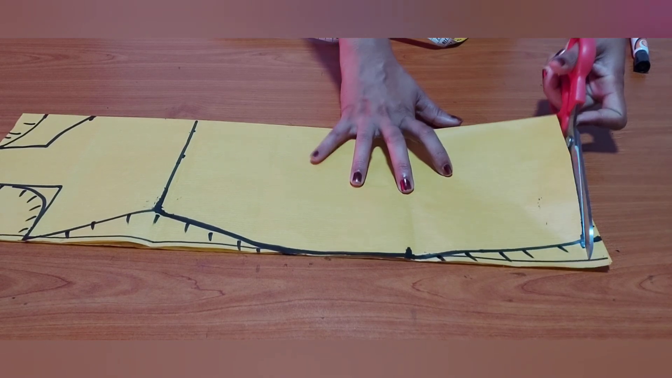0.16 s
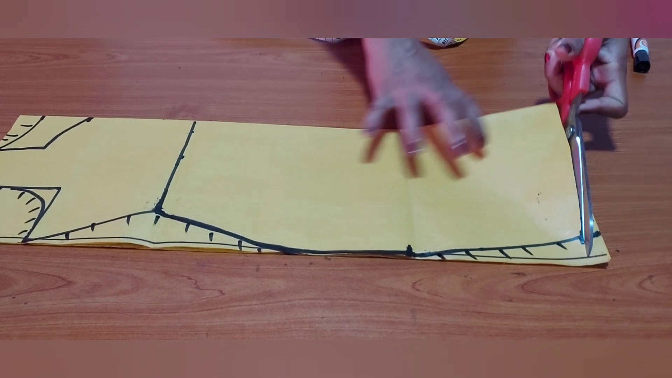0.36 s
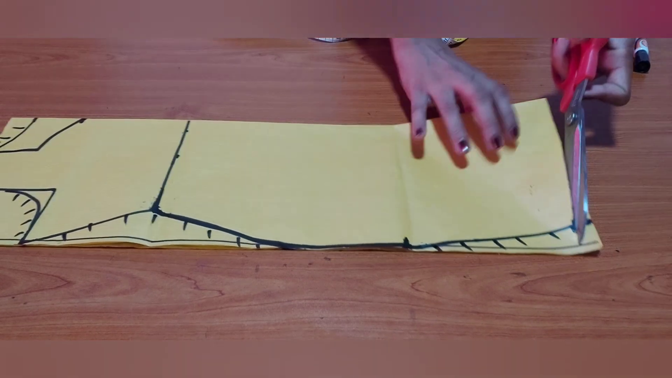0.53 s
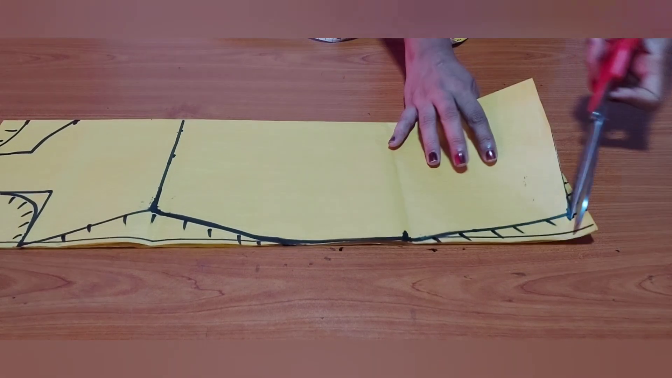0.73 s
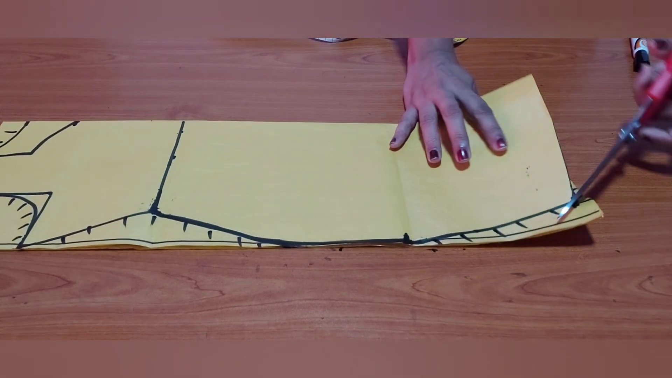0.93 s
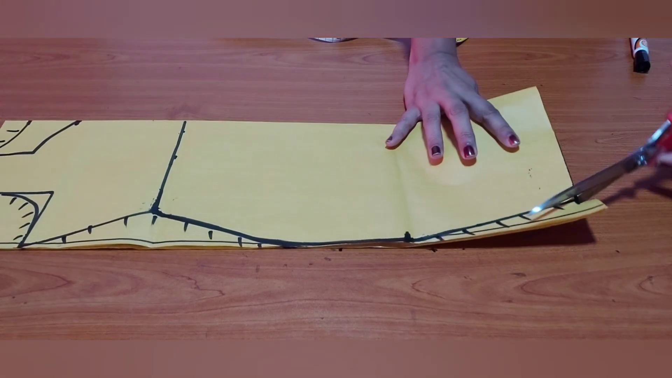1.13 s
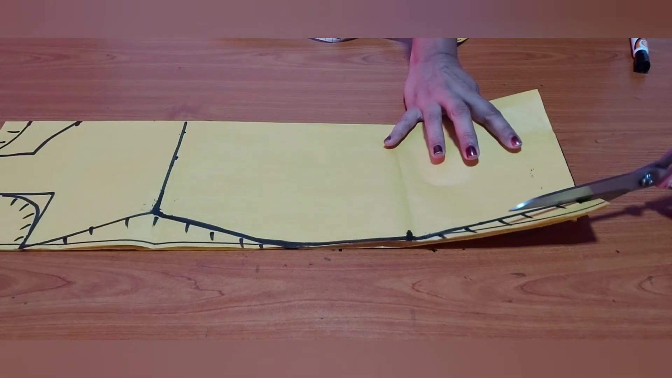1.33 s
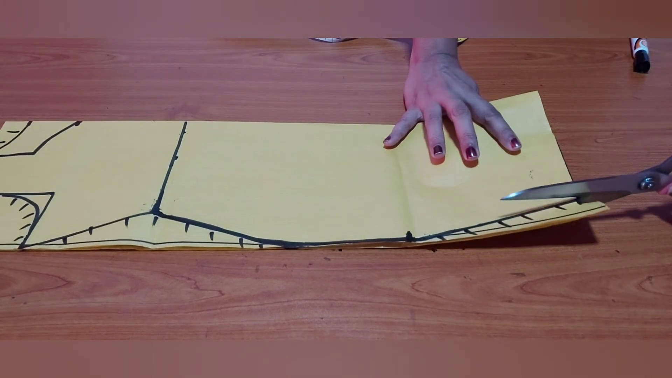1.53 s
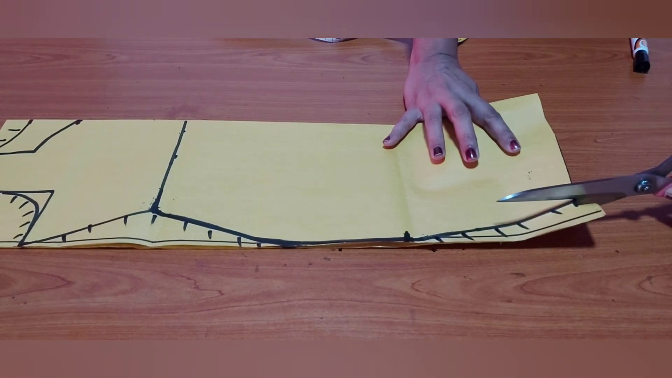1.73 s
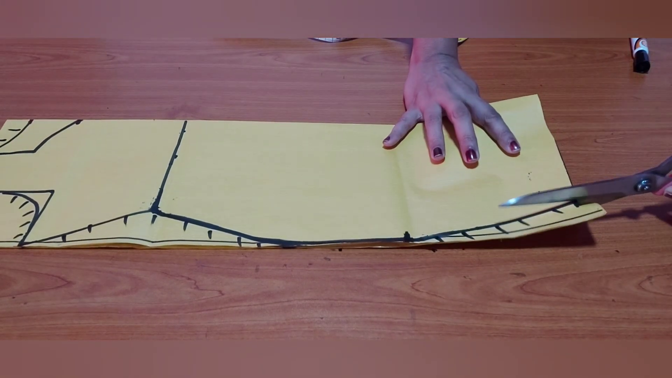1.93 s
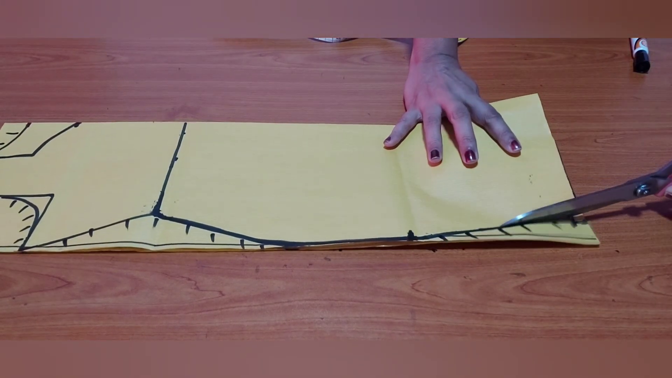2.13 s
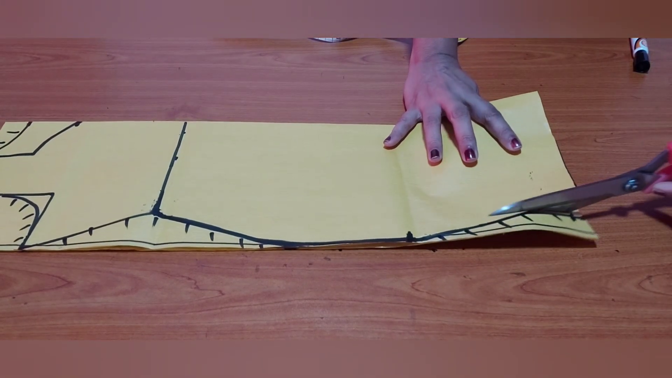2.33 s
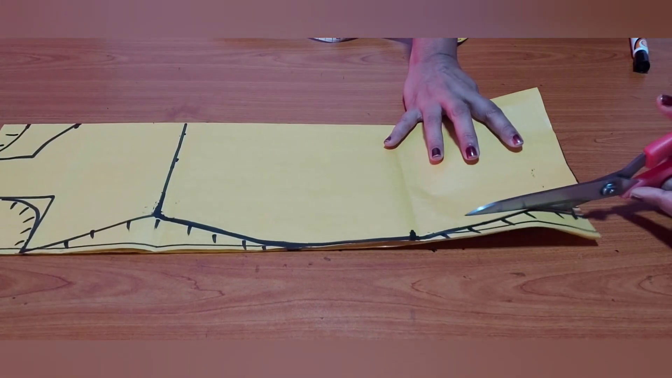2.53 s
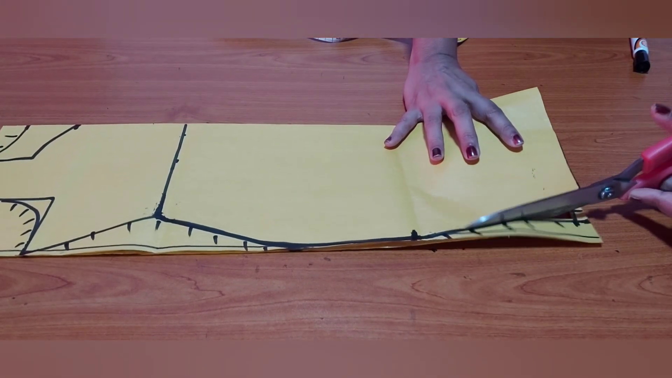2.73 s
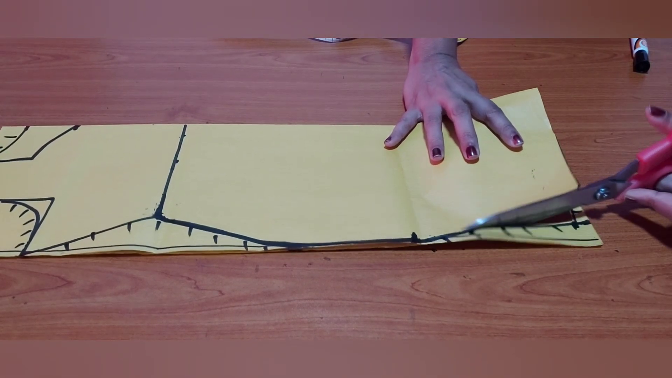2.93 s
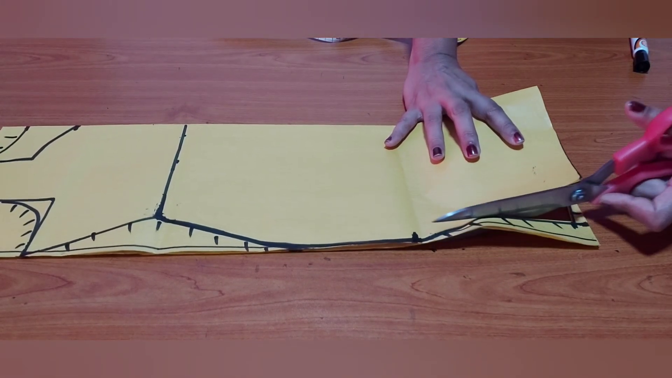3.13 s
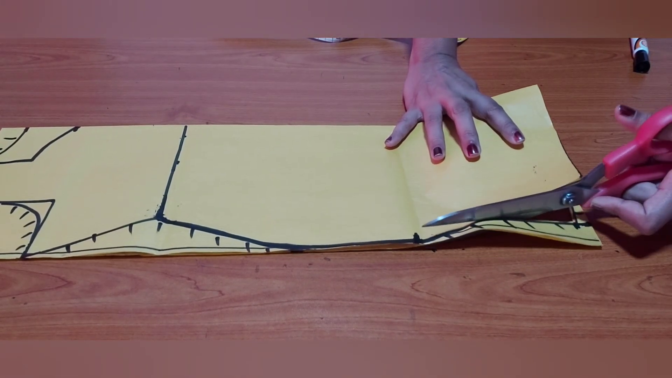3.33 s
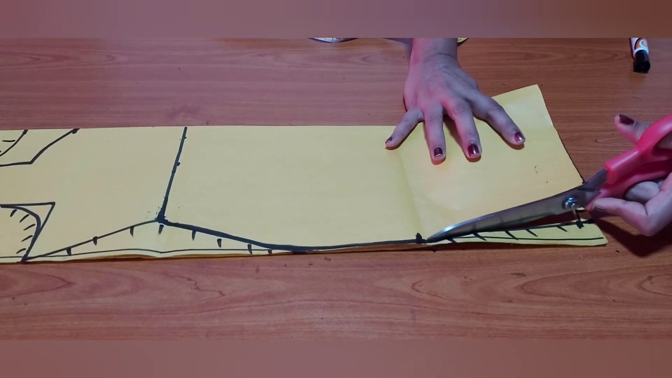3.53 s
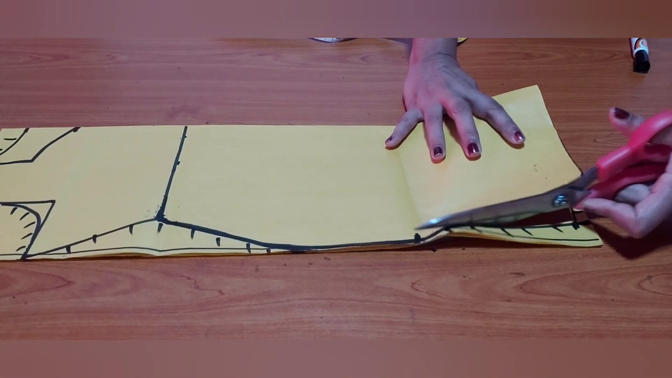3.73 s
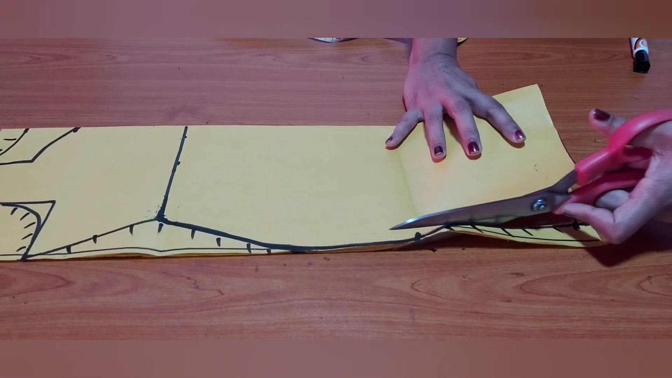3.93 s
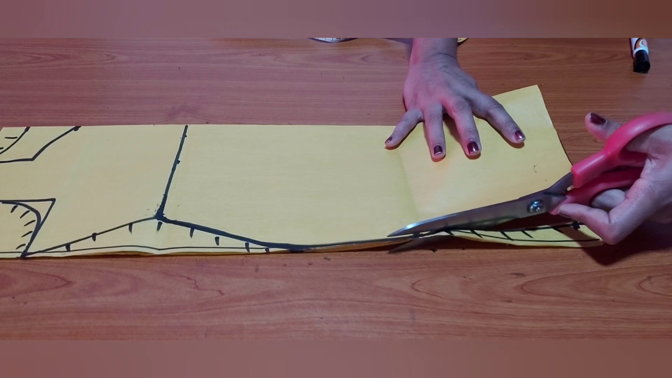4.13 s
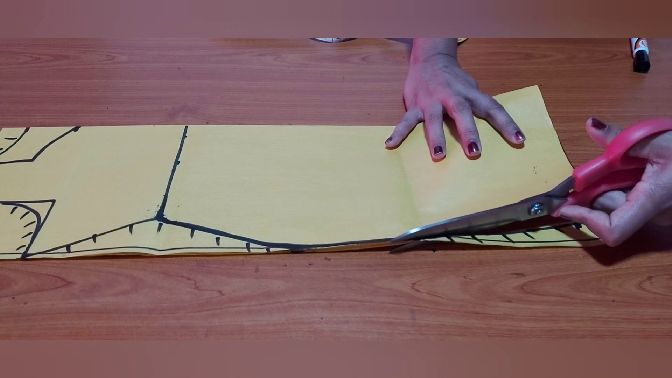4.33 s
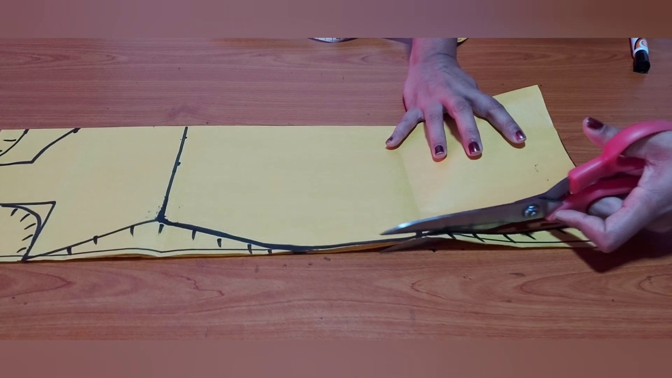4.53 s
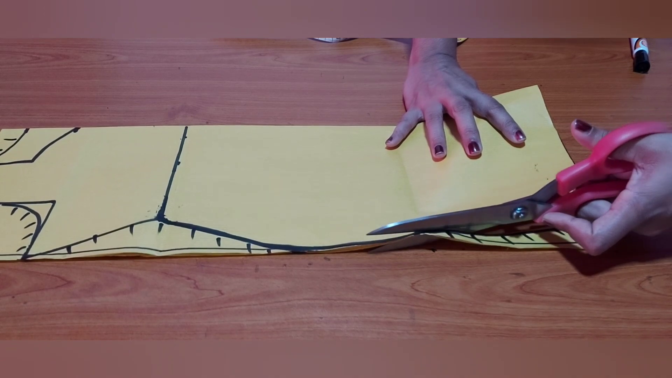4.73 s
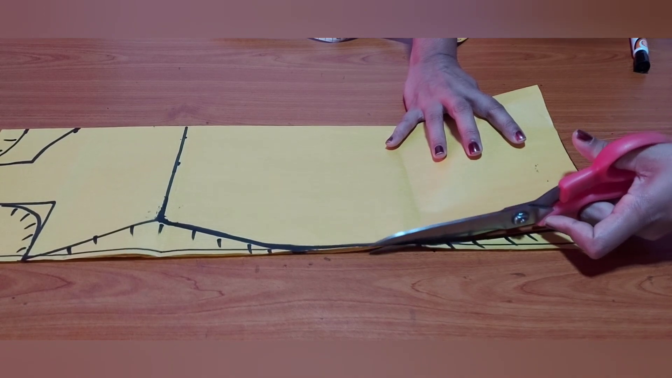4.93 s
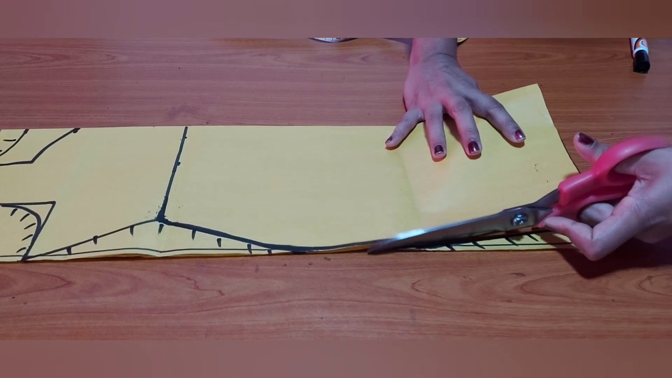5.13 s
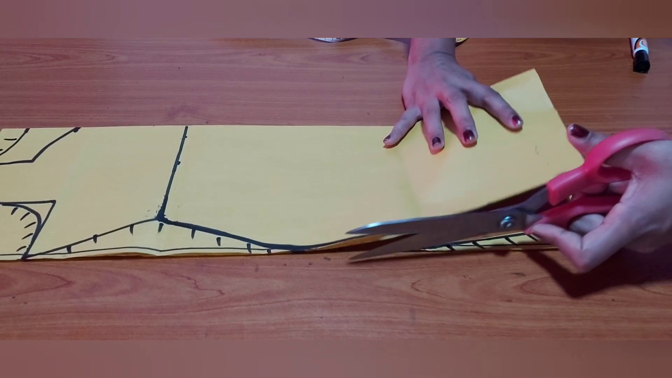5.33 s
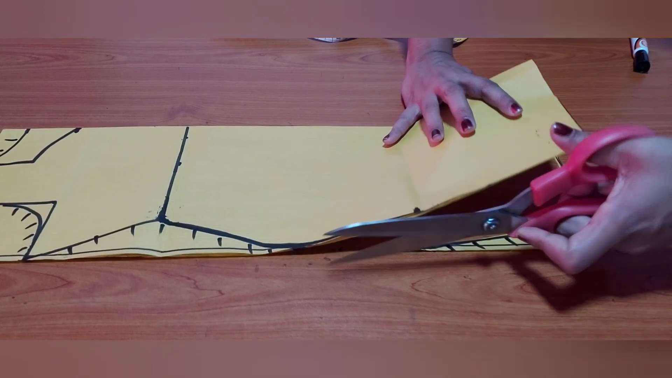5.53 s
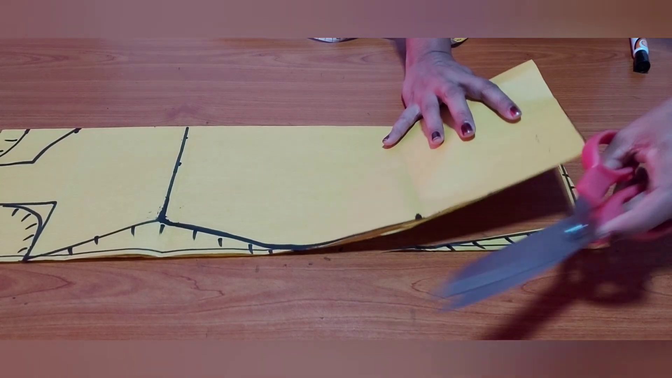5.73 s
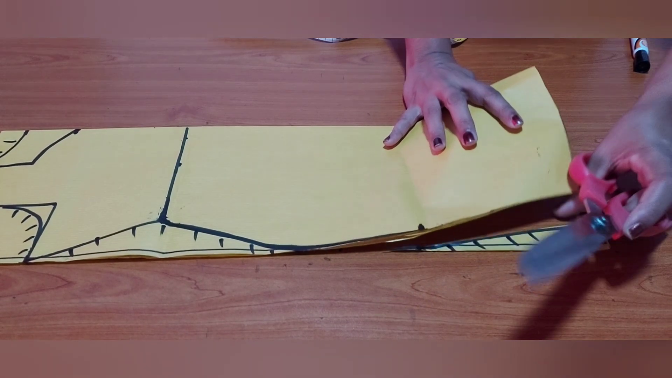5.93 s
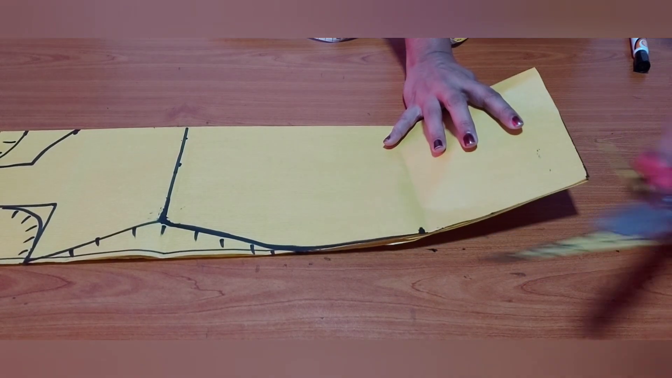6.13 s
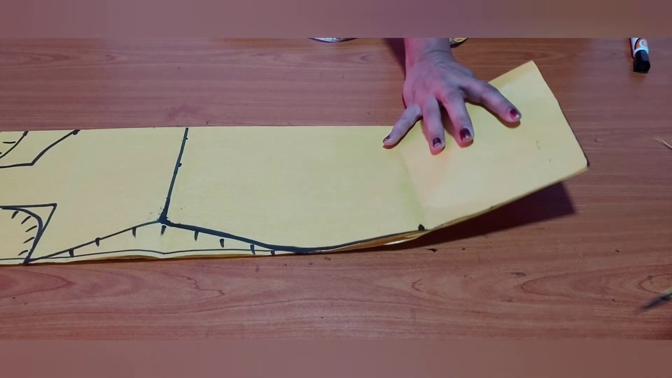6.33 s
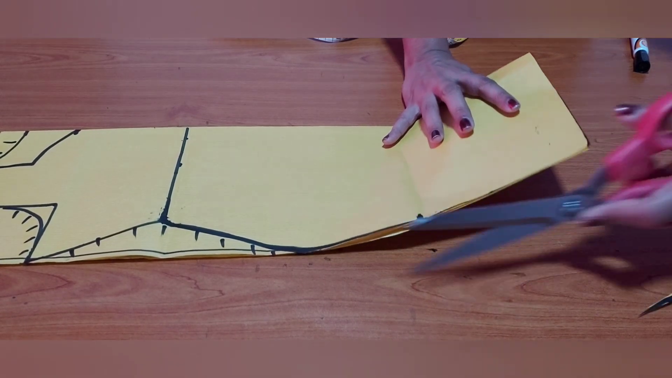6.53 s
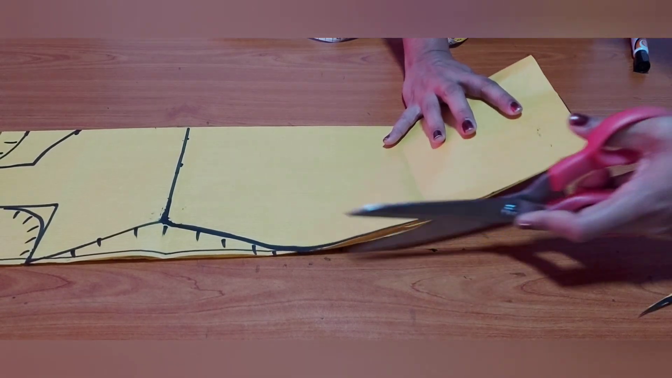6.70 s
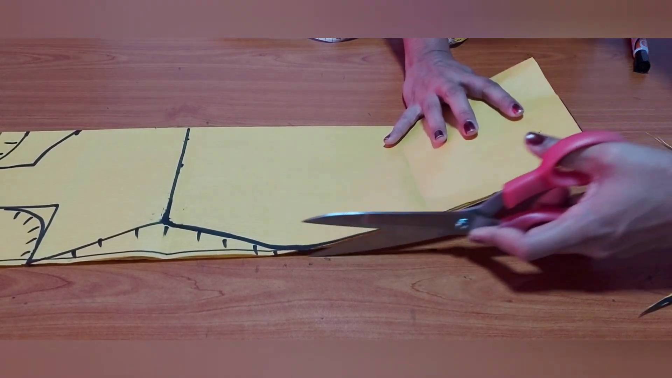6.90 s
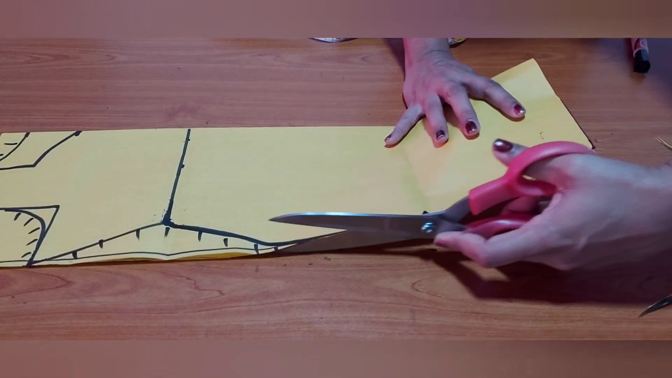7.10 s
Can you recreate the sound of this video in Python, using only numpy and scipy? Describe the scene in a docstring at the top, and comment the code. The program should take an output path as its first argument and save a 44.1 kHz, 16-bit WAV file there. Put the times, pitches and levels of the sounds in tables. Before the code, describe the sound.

Close by in a quiet, humming room, a brief snip and a sharp tick lead into a run of five gritty cuts as big scissors work through folded paper. The blades catch and slip, drumming lightly on the wooden table, and slide softly open between strokes. After one more quick snip the paper rustles, the blades scrape together, and a final, fainter cut is heard.

```python
"""Large shears cut folded paper on a wooden table, over the low hum of a small bare room.
A snip dies away; hand and paper shift, a sharp tick falls at 0.7 s, a faint tone passes at 1.5 s.
From 2 to 5 s, five strokes tear fibres in dense grains and slip in jolts that the lower blade drums
into the table top; between strokes the blades reopen with a soft hiss and a ringing pivot.
A short snip follows at 5.2 s, then rustling, blade rasps at 6.4 s and a weak last cut at 6.9 s."""
import sys
import numpy as np
from scipy import signal
from scipy.fft import rfft, irfft, next_fast_len
from scipy.io import wavfile

SR = 44100
rng = np.random.default_rng(int(sys.argv[2]) if len(sys.argv) > 2 else 0)


def to_wav(sig):
    """Store sig (one row per channel, or 1-D mono) as 16-bit WAV at the path in sys.argv[1].

    Samples outside -1..1 are clipped; the rate is SR.
    """
    pcm = np.clip(np.atleast_2d(sig), -1, 1) * 32767
    pcm = np.round(pcm).astype(np.int16)
    wavfile.write(sys.argv[1], SR, pcm.T)  # frames by channels


N = 320166
SIZE = next_fast_len(N + SR)
HZ = np.maximum(np.fft.rfftfreq(SIZE, 1 / SR), 1)
TIME_S = np.arange(N) / SR

# Building hum spectrum: freq_hz, gain_db
HUM_SPECTRUM = [(12, -44), (20, -22), (53, -9.5), (130, -15), (204, -10), (367, -8), (624, -19.5),
                (802, -18.5), (1120, -22.5), (1480, -26.5), (2390, -31), (3070, -32.5), (16000, -55.5)]
# Hum resonances: freq_hz, width_hz, gain_db
HUM_MODES = [(106.5, 14, 18.5), (147.7, 21, 17.5), (340, 60, 2), (7500, 1500, 17)]
# Faint tone path: time_s, pitch_hz, level_db
TONE_PATH = [(1.549, 745, -69), (1.619, 790, -65), (1.749, 795, -74), (1.918, 800, -73)]
# Room decay: freq_hz, t60_s
ROOM_DECAY = [(80, 0.9), (250, 0.13), (1500, 0.39), (4000, 0.39), (12000, 0.18)]
# Left-right likeness: freq_hz, correlation
STEREO_LIKENESS = [(60, 0.91), (300, 0.9), (700, 0.74), (1200, 0.36), (2500, 0.041), (8000, 0.013)]
# Left channel against right: freq_hz, gain_db
LEFT_RESPONSE = [(60, -3), (110, 0), (300, -5), (700, -1.5), (2000, -1.5), (3100, -3), (4300, 0),
                 (6800, -0.5), (7700, -4), (8900, -16), (12500, -5), (15500, -10)]

# Dry ticks of pivot and paper: time_s, level_db, dull_share
TICKS = [(0.204, -44, .2), (0.3721, -45.5, .2), (0.6995, -14, .03), (.9934, -45, .8), (1.027, -43, .4),
         (1.067, -41, .97), (1.761, -54, .3), (1.904, -54.5, .2), (3.370, -41, 0.2), (3.4075, -29, 0),
         (4.2113, -30, .2), (5.081, -29, 0.7), (5.672, -41, 0)]
# Tick spectrum: freq_hz, gain_db
TICK_SPECTRUM = [(600, -29.5), (2000, -7), (4000, -7.5), (6000, -3.5), (7600, 8), (9800, 2.5), (14000, 1),
                 (22000, -28)]
# Pivot friction spectrum: freq_hz, gain_db
PIVOT_SPECTRUM = [(500, -35.5), (1000, -1), (5000, -8), (9000, -24.5)]
# Open-blade resonances: freq_hz, width_hz, gain_db
PIVOT_MODES = [(1130, 36, 22.5), (1352, 81, 14.5), (2300, 71, 15), (2756, 48, 15.5), (4290, 99, 13)]
# Ring of a snip just ended: pitch_hz, level_db, t60_s
SNIP_PARTIALS = [(602, -22.5, 0.19), (1342, -24.5, 0.43)]
# Blade-on-blade rasps: start_s, level_db, t60_s
RASPS = [(5.205, -31, 0.079), (6.384, -33, 0.075), (6.395, -19, 0.038), (6.411, -19.5, 0.026)]
# Rasp resonances: freq_hz, width_hz, gain_db
RASP_MODES = [(2214, 150, 12), (3850, 270, 8.5), (7460, 730, 9), (8950, 310, 14), (11200, 570, 9.5),
              (13040, 400, 9)]
# Sliding paper and skin spectrum: freq_hz, gain_db
RUSTLE_SPECTRUM = [(900, -44), (1500, -19.5), (2500, -5), (2830, -8.5), (3260, -10), (5780, -5.5),
                   (8020, -0.5), (12500, -5.5), (16000, -4.5)]
# Steel-on-paper hiss spectrum: freq_hz, gain_db
HISS_SPECTRUM = [(1200, -40.5), (2200, -3.5), (3100, -8), (4200, -9.5), (5200, -12), (6300, -11),
                 (7600, -8), (10000, -11), (12000, -10), (16000, -19)]
# Edge crack and rasp spectrum: freq_hz, gain_db
CRACK_SPECTRUM = [(600, -33.5), (2000, -10), (3300, -4.5), (6000, 0), (7600, 3.5), (9800, -1), (12000, -1),
                  (16000, -11.5)]
# Blade resonances: freq_hz, width_hz, gain_db
BLADE_MODES = [(2300, 390, 12), (4200, 500, 1), (7340, 700, 3), (12000, 1300, 9)]

# Hand or handle bumps on the table: start_s, level_db
BUMPS = [(0.005, -30), (2.78, -23), (3.499, -22), (3.56, -29), (4.3, -30), (5.79, -49), (6.415, -39)]
# Bump spectrum: freq_hz, gain_db
BUMP_SPECTRUM = [(40, -29.5), (90, -10), (150, 2), (220, -11.5), (500, -48.5)]
# Table rumble spectrum: freq_hz, gain_db
RUMBLE_SPECTRUM = [(25, -20), (60, -21), (110, -11.5), (200, -6.5), (330, 2.5), (480, -8.5), (800, -12),
                   (2000, -58)]
# Table top and blade resonances: freq_hz, width_hz, gain_db
BODY_MODES = [(112.9, 12, 12), (144.4, 5.2, 11), (336, 42, 2.5), (393, 56, 7), (514, 12, 6.5),
              (596, 12, 0.5), (773, 89, 0.5), (1102, 70, 3.5), (1360, 50, -0.5), (1842, 69, 2.5),
              (3220, 210, 6), (4030, 790, 4.5)]
# Tearing fibre spectrum: freq_hz, gain_db
CRUNCH_SPECTRUM = [(150, -57.5), (350, -4.5), (600, -6), (1100, 3), (1500, -2), (2200, -7.5), (3500, -19.5),
                   (6000, -27), (12000, -33)]

# Hand, blades and paper shifting; swell and fade span 20 dB:
# start_s, swell_s, fade_s, crunch_db, rustle_db, rumble_db, dull_share
SHIFTS = [(0.1, 0.12, 0.11, -53, -46.5, -70, 1), (0.319, 0.23, 1, -80, -48.5, -75, 0.8),
          (0.472, 0.11, 0.3, -43, -48.5, -34, 0.84), (0.56, 0.15, 0.087, -38.5, -42, -41, 0.9),
          (0.7, .1, 1, -61.5, -73, -75, .5), (0.798, 0.091, 0.047, -40, -82, -54, 1),
          (0.969, 0.12, 0.23, -41.5, -74, -50.5, 0.84), (1.3, 0.0041, 0.15, -42, -72.5, -45, 0.27),
          (1.5, 0.031, 0.55, -59.5, -69, -80, 0.55), (2.4, 0.071, 0.13, -44.5, -53, -57, 0.6),
          (2.63, 0.044, 0.14, -49, -54, -57, 0.2), (3.03, 0.12, 0.2, -43.5, -47, -43, 0.3),
          (3.36, 0.024, 0.28, -48.5, -62, -52, 0.7), (3.41, 0.029, 0.036, -49, -50.5, -54, 0.2),
          (4.04, 0.055, 0.056, -48, -52, -43.5, 0.5), (4.74, 0.031, 0.041, -54.5, -99, -50, 0.04),
          (5.649, 0.03, 0.12, -64, -54, -60.5, 0.14), (5.89, 0.091, 0.11, -58.5, -62, -69, 0),
          (5.9, 0.29, 0.38, -78, -45.5, -73, .1), (6.08, 0.081, 0.15, -45, -61, -71, 0.4),
          (6.13, 0.092, 0.057, -40.5, -38.5, -75, 0.01), (6.83, 0.058, 0.046, -78, -61.5, -69, 0.5),
          (6.971, 0.098, 0.2, -35.5, -41.5, -65, 0.4), (7.1, 0.14, 0.55, -52, -55, -43, 0)]
# Blades opening along the slit: start_s, length_s, crunch_db, hiss_db, rumble_db, pivot_db
OPENINGS = [(2.278, 0.24, -51, -48, -59, -60), (2.949, 0.2, -42.5, -45.5, -48, -54),
            (3.712, 0.24, -47, -42, -54, -54), (4.506, 0.16, -53, -48.5, -57, -53.5),
            (6.635, 0.046, -66, -69, -74, -62)]
# Closing strokes: start_s, length_s, bite_crunch_db, end_crunch_db, hiss_db, rumble_db, dull_share
CUTS = [(0.0, 0.021, -21.5, -27, -34.5, -37, 0.67), (1.963, 0.23, -37, -17, -45, -29.5, 0.69),
        (2.728, 0.13, -24, -19.5, -35, -31.5, 0.51), (3.462, 0.11, -26.5, -18.5, -37.5, -30, 0.35),
        (4.148, 0.25, -36.5, -32, -50.5, -32, 0.96), (4.828, 0.21, -32.5, -27.5, -44, -33, 0.54),
        (5.222, 0.018, -43.5, -25, -28, -29, 0), (6.909, 0.18, -37, -43.5, -58, -37.5, 0.46)]
# Blades biting, slipping or touching down: time_s, crack_db, knock_db, knock_t60_s
JOLTS = [(0.017, -39, -27.5, 0.08), (0.8494, -58, -55, 0.091), (1.306, -65, -29.5, 0.051),
         (1.9693, -41.5, -28.5, 0.088), (2.0, -28.5, -23.5, 0.035), (2.0509, -22, -19, 0.051),
         (2.09, -18, -13.5, 0.15), (2.123, -21, -19, 0.15), (2.1616, -19, -17, 0.053),
         (2.3017, -32, -36, 0.082), (2.7356, -53, -19, 0.042), (2.798, -21.5, -23, 0.1),
         (2.8245, -25.5, -14, 0.087), (2.8721, -27.5, -15.5, 0.093), (3.386, -45, -44, 0.071),
         (3.458, -22, -28, 0.17), (3.469, -29.5, -21.5, 0.099), (3.491, -34, -15, 0.056),
         (3.519, -25, -15, .04), (3.534, -35, -19, .04), (3.552, -30.5, -28, .05),
         (3.567, -35.5, -18.5, .04), (3.6267, -27, -13, 0.088), (4.096, -47, -42.5, 0.055),
         (4.1481, -29.5, -22, 0.093), (4.178, -25.5, -17.5, 0.081), (4.235, -42, -16.5, 0.063),
         (4.2494, -23.5, -33, 0.036), (4.2569, -28.5, -10.5, 0.03), (4.284, -27.5, -18.5, 0.075),
         (4.293, -36, -20, .1), (4.327, -26, -14.5, 0.055), (4.371, -37.5, -22, 0.041),
         (4.3999, -31.5, -13.5, 0.057), (4.826, -53, -27, 0.024), (4.846, -32.5, -18.5, 0.08),
         (4.8792, -27.5, -14, 0.034), (4.901, -29.5, -19, 0.053), (4.932, -26.5, -11.5, 0.042),
         (4.9406, -33, -18, 0.046), (4.955, -33.5, -16, 0.045), (4.9656, -36, -14, 0.045),
         (4.988, -32, -16, 0.056), (5.233, -38, -15, 0.086), (5.2504, -41.5, -18.5, 0.036),
         (6.9122, -48, -27, 0.051)]


def amp(db):
    """dB to gain."""
    return 10 ** (np.asarray(db) / 20)


def unit_rms(x):
    """Scale to unit power."""
    return x / np.sqrt(np.mean(x ** 2) + 1e-20)


def at_hz(points, hz=HZ):
    """Interpolate a table over log frequency."""
    freq_hz, values = np.transpose(points)
    return np.interp(np.log(hz), np.log(freq_hz), values)


def colour(x, spectrum, modes=(), pitch_ratio=1):
    """Minimum-phase filter: transposed spectrum plus resonances. White noise keeps its power."""
    slope_db = at_hz(np.array(spectrum) * [pitch_ratio, 1])
    peaks_db = sum(db / (1 + (2 * (HZ - hz) / width_hz) ** 2) for hz, width_hz, db in modes)
    cepstrum = irfft(np.log(unit_rms(amp(slope_db + peaks_db))), SIZE)
    cepstrum[1:SIZE // 2] *= 2
    cepstrum[SIZE // 2 + 1:] = 0
    return irfft(rfft(x, SIZE) * np.exp(rfft(cepstrum)), SIZE)[..., :N]


def flicker(rate_hz):
    """Slow random drift, unit RMS."""
    pole = np.exp(-2 * np.pi * rate_hz / SR)
    drift = signal.lfilter([1], [1, -2 * pole, pole * pole], rng.standard_normal(N + SR))
    return unit_rms(drift[SR:])


def grains(rate_per_s, uneven_db, clump_db):
    """Random fibre snaps, uneven and clumped; mid and side streams."""
    sizes = amp(uneven_db * np.minimum(rng.exponential(1, (2, N)), 5))
    signs = rng.choice([-1, 1], (2, N))
    snaps = rng.random((2, N)) < rate_per_s / SR
    return unit_rms(sizes * signs * snaps * amp(clump_db * flicker(40)))


def bursts(starts_s, levels_db, rise_s, t60_s):
    """Noise that swells and dies at each start; mid and side streams."""
    envelope, t = np.zeros(N), np.arange(SR // 4) / SR
    for start_s, db, decay_s in np.broadcast(starts_s, levels_db, t60_s):
        at = round(start_s * SR)
        envelope[at:at + len(t)] += amp(db - 60 * t / decay_s) * (1 - np.exp(-t / rise_s)) ** 2
    return envelope * rng.standard_normal((2, N))


def stereo_spectra(streams):
    """Mid and side to left and right spectra: alike in the bass, apart in the treble."""
    mid, side = rfft(streams, SIZE)
    likeness = np.clip(at_hz(STEREO_LIKENESS), 0, 1)
    return (np.sqrt(1 + likeness) * mid + np.sqrt(1 - likeness) * side * [[1], [-1]]) / np.sqrt(2)


def spread(streams, left_lag_s):
    """Contacts lie spread over the paper; their sound arrives late on the left."""
    delay = np.exp(-2j * np.pi * HZ * left_lag_s * [[1], [0]])
    return irfft(stereo_spectra(streams) * delay, SIZE)[:, :N]


def hum(level_db=-59, flicker_db=0.78):
    """Low murmur of the building, with faint hiss."""
    noise = irfft(stereo_spectra(rng.standard_normal((2, SIZE))), SIZE)[:, :N]
    return amp(level_db + flicker_db * flicker(17)) * colour(noise, HUM_SPECTRUM, HUM_MODES)


def faint_tone(ramp_s=0.013):
    """A thin tone swells and fades once."""
    times_s, pitch_hz, level_db = np.transpose(TONE_PATH)
    gate = np.clip(np.minimum(TIME_S - times_s[0], times_s[-1] - TIME_S) / ramp_s, 0, 1)
    phase = 2 * np.pi * np.cumsum(np.interp(TIME_S, times_s, pitch_hz)) / SR
    return np.sqrt(2) * gate * amp(np.interp(TIME_S, times_s, level_db)) * np.sin(phase)


def room_echoes(x, onset_s=0.0041):
    """Dense reflections: a stereo noise tail with its own decay in each octave."""
    noise = stereo_spectra(rng.standard_normal((2, SIZE)))
    t, tail = np.arange(SR) / SR, 0
    for hz in 40 * 2. ** np.arange(9):
        band = np.clip(1 - np.abs(np.log2(HZ / hz)), 0, 1)
        t60_s = at_hz(ROOM_DECAY, hz)
        decay = amp(-60 * t / t60_s) / np.sqrt(t60_s * SR / np.log(1e6))   # unit energy
        tail = tail + irfft(noise * band, SIZE)[:, :SR] * decay
    tail = tail * np.clip(t / onset_s, 0, 1)
    return irfft(rfft(x, SIZE) * rfft(tail, SIZE), SIZE)[:, :N]


def stroke_db(start_s, rise_s, end_db, hold_s, swell_db, fade_db_per_s):
    """One movement: up 20 dB over rise_s, on by swell_db to end_db, then a fade."""
    t = TIME_S - start_s - rise_s
    held_db = end_db + swell_db * (np.clip(t / hold_s, 0, 1) - 1)
    return held_db + 20 * np.minimum(t / rise_s, 0) - fade_db_per_s * np.maximum(t - hold_s, 0)


def opening_db(start_s, length_s, level_db, sag_db_per_s=13.5):
    """Blades open: fast rise, slow sag, fade."""
    sag_db = sag_db_per_s * length_s
    return stroke_db(start_s, 0.011, level_db - sag_db, length_s, -sag_db, fade_db_per_s=109.5)


def cut_db(start_s, length_s, bite_db, end_db, hiss_db, rumble_db, bite_s=0.0031, release_s=0.016):
    """Blades close: hiss and rumble partly follow the crunch; crunch and hiss drop at the stop."""
    swell_db = end_db - bite_db
    release_db = 6.5 * np.clip((TIME_S - start_s - length_s) / release_s, 0, 1)
    crunch = stroke_db(start_s, bite_s, end_db, length_s, swell_db, fade_db_per_s=133)
    hiss = stroke_db(start_s, bite_s, hiss_db, length_s, 0.2 * swell_db, fade_db_per_s=243)
    rumble = stroke_db(start_s, 0.015, rumble_db, length_s, 0.23 * swell_db, fade_db_per_s=163.5)
    return [crunch - release_db, hiss - release_db, rumble]


def gesture_powers(levels_db, dull_share, on_blades):
    """One gesture as clear crunch, dull crunch, blade hiss, rustle and rumble powers."""
    crunch, slide, rumble = amp(np.maximum(levels_db, -200)) ** 2
    hiss, rustle = on_blades * slide, (not on_blades) * slide
    return np.array([(1 - dull_share) * crunch, dull_share * crunch, hiss, rustle, rumble])


def gesture_levels_db(stick_db=3.5, stick_s=0.021):
    """All gestures add in power; crunch and hiss dip as the blades stick before each jolt."""
    power = 1e-20
    for *cut, dull_share in CUTS:
        power += gesture_powers(cut_db(*cut), dull_share, on_blades=True)
    for start_s, length_s, *levels_db, _ in OPENINGS:
        curves_db = opening_db(start_s, length_s, np.c_[levels_db])
        power += gesture_powers(curves_db, dull_share=0.14, on_blades=True)
    for start_s, swell_s, fade_s, *levels_db, dull_share in SHIFTS:
        curves_db = stroke_db(start_s, swell_s, np.c_[levels_db], 1 / SR, 0, 20 / fade_s)
        power += gesture_powers(curves_db, dull_share, on_blades=False)
    stuck = sum(np.clip(1 - (at_s - TIME_S) / stick_s, 0, 1) * (TIME_S < at_s) for at_s, *_ in JOLTS)
    return 10 * np.log10(power) - stick_db * stuck * [[1], [1], [1], [0], [0]]


def ticks(dull_ratio=0.42):
    """Tiny hard contacts: a click and a brief spray, each part bright, part dull."""
    times_s, level_db, dull_share = np.transpose(TICKS)
    dull_share = np.clip(dull_share, 0.001, 0.999)
    out = 0
    for share, ratio in ((1 - dull_share, 1), (dull_share, dull_ratio)):
        share_db = level_db + 10 * np.log10(share)
        spray = bursts(times_s, share_db + 8, rise_s=0.0001, t60_s=0.0025)
        spray[0, np.round(times_s * SR).astype(int)] += amp(share_db + 8.5)
        out = out + colour(spray, TICK_SPECTRUM, pitch_ratio=ratio)
    return out


def snip_ring():
    """Blades and table ring unevenly from a snip just ended; mid stream only."""
    ring = sum(amp(db - 60 * TIME_S / t60_s) * flicker(54) * np.sin(2 * np.pi * hz * TIME_S)
               for hz, db, t60_s in SNIP_PARTIALS)
    return ring * [[1], [0]]


def pivot_ring():
    """Pivot friction drives the narrow modes of the opening blades."""
    gain = sum(amp(opening_db(start_s, length_s, db)) for start_s, length_s, *_, db in OPENINGS)
    friction = gain * grains(rate_per_s=3500, uneven_db=2, clump_db=3.5)
    return colour(friction, PIVOT_SPECTRUM, PIVOT_MODES)


def edge_friction(hiss_db, rustle_db, crack_lead_s=0.0032):
    """Steel rubs on paper, paper rustles, the edge cracks ahead of each knock, blades rasp."""
    rub = amp(hiss_db) * grains(rate_per_s=9200, uneven_db=1.5, clump_db=1.2)
    rustle = amp(rustle_db) * grains(rate_per_s=14000, uneven_db=4.5, clump_db=0.8)
    jolt_s, crack_db, *_ = np.transpose(JOLTS)
    cracks = bursts(jolt_s - crack_lead_s, crack_db, rise_s=0.0024, t60_s=0.039)
    rasp_s, rasp_db, rasp_t60_s = np.transpose(RASPS)
    rasps = bursts(rasp_s, rasp_db, rise_s=0.0055, t60_s=rasp_t60_s)
    return (colour(rub, HISS_SPECTRUM) + colour(rustle, RUSTLE_SPECTRUM)
            + colour(cracks, CRACK_SPECTRUM, BLADE_MODES) + colour(rasps, CRACK_SPECTRUM, RASP_MODES))


def table_top(rumble_db, thud_gain_db=-14):
    """Low modes of the wood: hand weight rumbles, jolts thud, hand or handle bumps."""
    weight = amp(rumble_db) * grains(rate_per_s=3000, uneven_db=-0.7, clump_db=1)
    jolt_s, _, knock_db, _ = np.transpose(JOLTS)
    thuds = bursts(jolt_s, knock_db + thud_gain_db, rise_s=0.0056, t60_s=0.092)
    bumps = bursts(*np.transpose(BUMPS), rise_s=0.014, t60_s=0.16) * [[1], [0.3]]
    return (colour(weight, RUMBLE_SPECTRUM, BODY_MODES)
            + colour(thuds, RUMBLE_SPECTRUM, BODY_MODES, pitch_ratio=0.52)
            + colour(bumps, BUMP_SPECTRUM, BODY_MODES))


def jolt_knocks(snaps_per_s=4000, click_gain_db=12, side_gain=0.78):
    """Each jolt: a hard click, then a quick run of fibre snaps from one spot."""
    jolt_s, _, knock_db, t60_s = np.transpose(JOLTS)
    snaps = unit_rms(rng.random(N) < snaps_per_s / SR)
    knocks = snaps * bursts(jolt_s, knock_db, rise_s=0.00092, t60_s=t60_s) * [[1], [side_gain]]
    knocks[0, np.round(jolt_s * SR).astype(int)] += amp(knock_db + click_gain_db)
    return knocks


def paper_crunch(clear_db, dull_db):
    """Tearing fibres and jolts ring in blades and wood; the dull crunch lies lower."""
    clear = amp(clear_db) * grains(rate_per_s=2500, uneven_db=2.5, clump_db=3) + jolt_knocks()
    dull = amp(dull_db) * grains(rate_per_s=5000, uneven_db=2, clump_db=3.5)
    return (colour(clear, CRUNCH_SPECTRUM, BODY_MODES)
            + colour(dull, CRUNCH_SPECTRUM, BODY_MODES, pitch_ratio=0.61))


def scene():
    """Shears, paper and table with their echoes, over hum and the faint tone."""
    clear_db, dull_db, hiss_db, rustle_db, rumble_db = gesture_levels_db()
    wood = paper_crunch(clear_db, dull_db) + table_top(rumble_db) + snip_ring()
    steel = edge_friction(hiss_db, rustle_db) + pivot_ring()
    contacts = ticks()
    echoes = room_echoes(amp(-4) * wood[0] + amp(-4.5) * steel[0] + amp(-13) * contacts[0])
    return spread(wood + steel + contacts, left_lag_s=0.00007) + echoes + hum() + faint_tone()


def record(dry, hiss_db=-78.5, cutoff_hz=16600):
    """Duller left channel, faint hiss on both, steep low-pass."""
    left = irfft(rfft(dry[0], SIZE) * amp(at_hz(LEFT_RESPONSE)), SIZE)[:N]
    channels = np.array([left, dry[1]]) + amp(hiss_db) * rng.standard_normal((2, N))
    return signal.sosfilt(signal.cheby2(16, 70, cutoff_hz, fs=SR, output="sos"), channels)


dry = scene()
out = record(dry)
to_wav(out)
```